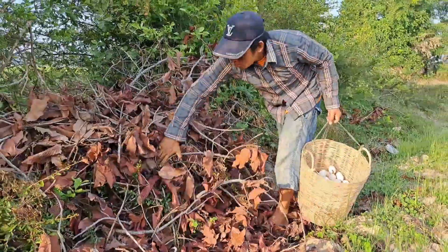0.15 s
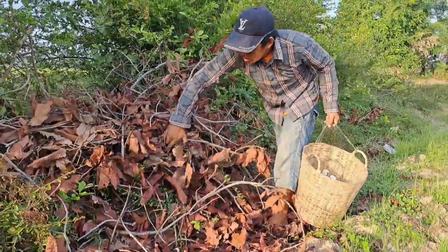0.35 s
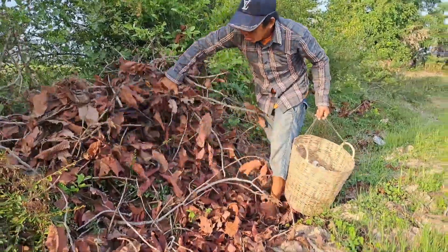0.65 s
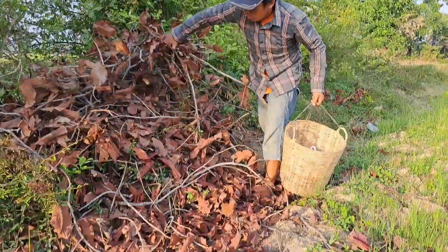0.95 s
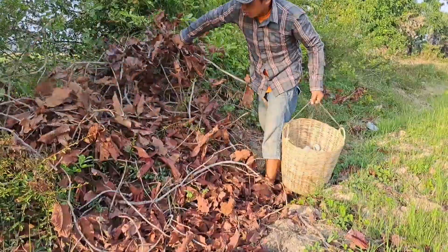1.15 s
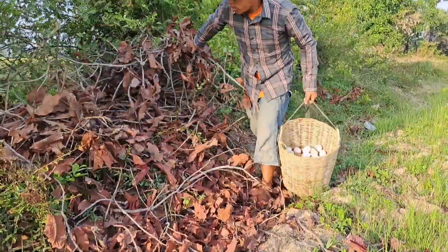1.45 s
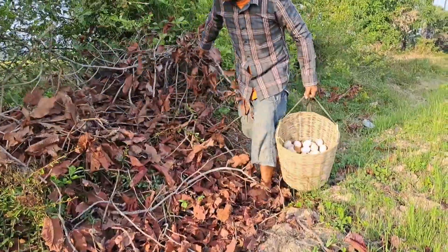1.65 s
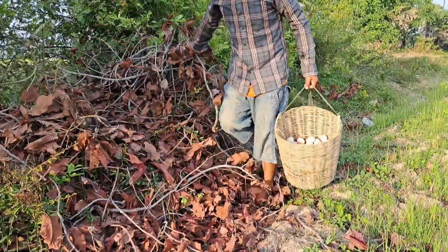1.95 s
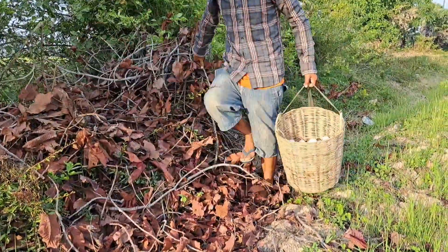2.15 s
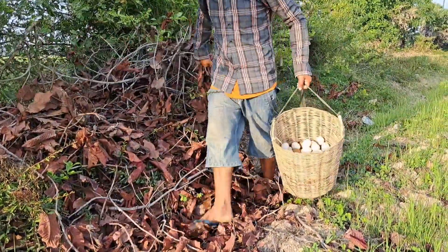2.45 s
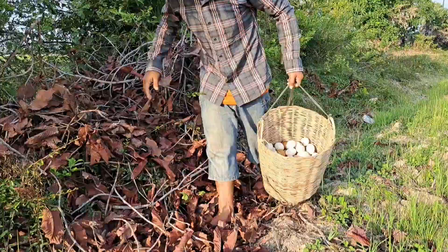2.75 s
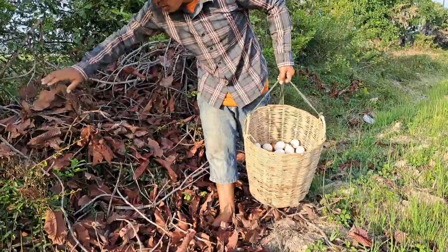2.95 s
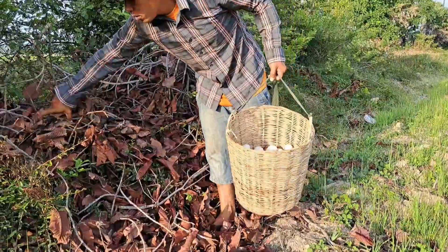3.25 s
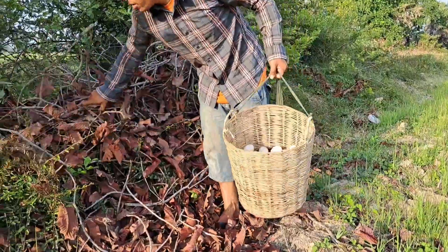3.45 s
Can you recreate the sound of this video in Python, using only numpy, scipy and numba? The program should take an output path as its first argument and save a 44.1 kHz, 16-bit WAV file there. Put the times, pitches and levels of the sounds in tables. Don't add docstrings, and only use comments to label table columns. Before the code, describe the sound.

Close, crisp rustling of a dry leaf pile with stalks cracking, easing off before a foot sinks in and a twig snaps sharply, sparse ticks, then renewed rustling; open grassy place, soft cricket chirps and faint hiss.

```python
import sys
import numpy as np
from scipy import signal
from scipy.fft import rfft, irfft
from scipy.io import wavfile
from numba import njit

SR = 44100
rng = np.random.default_rng(int(sys.argv[2]) if len(sys.argv) > 2 else 0)


def generate_wav(sig):
    pcm = np.round(np.clip(np.atleast_2d(sig).T, -1, 1) * 32767).astype(np.int16)
    wavfile.write(sys.argv[1], SR, pcm)


def level_to_linear(level):
    exponent = np.asarray(level, float) / 20
    return 10 ** exponent


N = 158760
LAG_SPREAD_MS = 0.075


def level(x, db):
    return x * level_to_linear(db) / np.sqrt(np.mean(x ** 2))


def butter(x, order, hz, kind):
    return signal.sosfilt(signal.butter(order, hz, kind, fs=SR, output="sos"), x)


def colour(x, points, share=0.99):
    points = np.array(points, float)
    hz = np.maximum(np.fft.rfftfreq(8192, 1 / SR), 1)
    db = share * np.interp(np.log(hz), np.log(points[:, 0]), points[:, 1])
    cepstrum = irfft(db * np.log(10) / 20)
    cepstrum[1:4096] *= 2
    cepstrum[4097:] = 0
    impulse = irfft(np.exp(rfft(cepstrum)))
    return signal.fftconvolve(np.atleast_2d(x), impulse[None], axes=1)[:, :N]


@njit
def ring(n, at, lag, turn, fade, size):
    out = np.zeros((2, n))
    for g in range(len(at)):
        step = np.exp(1j * turn[g] - fade[g])
        for port in range(2):
            start = at[g] + port * lag[g]
            first = int(np.ceil(start))
            z = size[g] * np.exp((1j * turn[g] - fade[g]) * (first - start))
            for j in range(max(first, 0), min(n, first + int(6 / fade[g]))):
                out[port, j] += z.imag
                z *= step
    return out


def grains(s, hz, t60, size, lag_ms):
    columns = np.broadcast_arrays(s, hz, t60, size, lag_ms)
    s, hz, t60, size, lag_ms = (np.ascontiguousarray(a, float).ravel() for a in columns)
    turn = 2 * np.pi * np.minimum(hz, 0.45 * SR) / SR
    return ring(N, s * SR, lag_ms * SR / 1000, turn, np.log(1000) / (t60 * SR), size)


# frequency in Hz, density in dB per Hz.
AIR_SPECTRUM = [(25, -4), (45, 4), (80, -7), (150, -6), (250, -20), (500, -7), (5000, -16), (15500, -17.5)]


def field():
    rumble_hz, width_hz = 61.5, 27
    mid, side, low, wind = rng.standard_normal((4, N))
    apart = np.array([[1], [-1]])
    side = butter(side, 1, 1500, "high") + 0.27 * wind
    hiss = colour(mid + side * apart, AIR_SPECTRUM)
    band = [rumble_hz - width_hz / 2, rumble_hz + width_hz / 2]
    rumble = butter(low + 0.077 * wind * apart, 2, band, "band")
    return butter(level(hiss, -51) + level(rumble, -58.5), 2, 32, "high")


# start in seconds, length in seconds, level in dB.
CHIRPS = [
    (1.2, 0.2, -2),
    (1.48, 0.22, -1),
    (1.794, 0.17, -3),
    (2.804, 0.27, -5),
    (3.17, 0.17, -3),
]


def cricket():
    rate_hz, wing_hz, wing_t60_s, strokes = 170, 7770, 0.015, 700
    rise_s, stop_s, level_db = 0.071, 0.006, -47.5
    s = np.arange(strokes) / rate_hz
    force, jitter, detune = rng.standard_normal((strokes, 3)).T
    swell = np.zeros(strokes)
    for start, length, db in CHIRPS:
        rise = np.clip((s - start) / rise_s, 0, 1)
        stop = np.clip((start + length - s) / stop_s, 0, 1)
        swell += rise * stop * level_to_linear(db)
    size = swell * level_to_linear(level_db + 8 + 2.8 * force)
    x = grains(s + 0.00016 * jitter, wing_hz * (1 + 0.0046 * detune), wing_t60_s, size, -0.04)
    return butter(x, 1, [7350, 8250], "band")


# time in seconds, effort in dB.
MOVES = [
    [(0, -36), (.08, -34.5), (.13, -34.5), (.27, -29), (.36, -32), (.43, -28), (.56, -28.5), (.75, -29.5),
     (.97, -29.5)],
    [(1.1, -34.5), (1.2, -34.5), (1.32, -35), (1.4, -38.5), (1.52, -35), (1.68, -37.5), (1.83, -42),
     (1.92, -38.5), (1.99, -39)],
    [(2.06, -45.5), (2.18, -44), (2.27, -37), (2.35, -40), (2.46, -38), (2.52, -35.5)],
    [(2.56, -36), (2.63, -34), (2.68, -36), (2.74, -43), (2.78, -53.5)],
    [(2.9, -50), (2.97, -52.5), (3.1, -49.5), (3.17, -40), (3.2, -56.5), (3.23, -40.5)],
    [(3.29, -50), (3.325, -39), (3.35, -32), (3.43, -30), (3.5, -30.5), (3.56, -32.5), (3.6, -28.5)],
]
# tilt in dB per octave, lag of the right port in ms.
PLACES = [
    (0.82, 0.12),
    (0.86, 0.099),
    (0.48, 0.057),
    (-0.5, 0.06),
    (-0.5, -0.026),
    (0.24, 0.17),
]


def place(s):
    move = np.searchsorted([m[0][0] for m in MOVES[1:]], s)
    return np.array(PLACES)[move].T


# time in seconds, peak in dB, pitch
# in Hz, decay (t60) in seconds.
RUSTLES = [(0.052, -28, 2200, 0.08), (0.065, -22, 2100, 0.08), (0.216, -23, 1470, 0.08),
           (0.299, -18, 2190, 0.08), (0.332, -18, 1920, 0.08), (0.383, -16, 900, 0.08),
           (0.417, -18, 5610, 0.08), (0.428, -20, 2120, 0.08), (0.549, -17, 2170, 0.08),
           (0.599, -19, 1420, 0.08), (0.632, -23.5, 630, 0.08), (0.667, -18, 1950, 0.08),
           (0.721, -25, 584, 0.08), (0.765, -11, 3480, 0.08), (0.796, -21, 5520, 0.08),
           (0.834, -13, 2940, 0.08), (0.89, -27, 2050, 0.08), (0.957, -23, 2350, 0.08),
           (1.024, -21, 1850, 0.08), (1.186, -21, 684, 0.08), (1.247, -17, 2030, 0.08),
           (1.267, -25, 912, 0.08), (1.29, -27.5, 713, 0.08), (1.305, -26, 990, 0.08),
           (1.409, -29, 907, 0.08), (1.447, -30, 1450, 0.08), (1.488, -27, 1590, 0.08),
           (1.495, -26, 5490, 0.08), (1.53, -25, 2000, 0.08), (1.558, -32, 1330, 0.08),
           (1.61, -20, 2190, 0.08), (1.635, -25, 2040, 0.08), (1.87, -28, 2710, 0.08),
           (1.899, -25, 5200, 0.08), (1.923, -28, 5050, 0.08), (1.96, -31, 2330, 0.08),
           (2.087, -37, 1490, 0.08), (2.153, -39, 904, 0.08), (2.181, -36, 2010, 0.08),
           (2.22, -35, 2360, 0.08), (2.241, -27, 4130, 0.08), (2.408, -29, 2710, 0.08),
           (.072, -24, 3900, .06), (.134, -21, 5600, .08), (.156, -15, 880, .2), (.8, -19, 4800, .2),
           (2.29, -28, 2400, .08), (2.473, -12, 3800, .03), (2.484, -22, 3600, .04),
           (2.525, -25, 900, 0.075), (2.57, -20, 800, .14), (2.578, -21, 2000, .1), (2.608, -22, 1100, .14),
           (2.62, -21, 800, .14), (2.59, -22, 1100, .12), (2.612, -23, 2200, .14), (2.64, -22, 500, .1),
           (2.636, -19, 1500, .12), (2.655, -18, 1100, .1), (3.168, -35, 1500, 0.025),
           (3.255, -32, 1200, 0.05), (3.36, -26, 1090, .06), (3.39, -28, 4800, 0.039),
           (3.426, -21, 2500, 0.069), (3.469, -33, 1000, .06), (3.495, -25, 4500, .05),
           (3.57, -26, 1500, .05), (3.588, -22, 3000, .05)]


def folds(count=40):
    level_db, spread_octaves, cycles = -10, 0.28, 11
    s, db, hz, t60 = np.array(RUSTLES).T[:, :, None]
    when, sign = np.moveaxis(rng.random((len(s), count, 2)), 2, 0)
    detune, aside = np.moveaxis(rng.standard_normal((len(s), count, 2)), 2, 0)
    late = when ** 1.4 * t60 / 2
    pitch = hz * 2 ** (spread_octaves * detune)
    size = level_to_linear(db + level_db - 60 * late / t60) * (2 * sign - 1) * np.sqrt(pitch / 1600)
    lag = place(s[:, 0])[1][:, None] + LAG_SPREAD_MS / 2 * aside
    return grains(s + late, pitch, cycles / pitch, size, lag)


def splinters(s, db, t60, tilt, lag_ms, count=120):
    s, db, t60, tilt, lag_ms = (a[:, None] for a in (s, db, t60, tilt, lag_ms))
    when, pitch, sign, aside = np.moveaxis(rng.random((len(s), count, 4)), 2, 0)
    late = when ** 1.35 * t60 / 2
    hz = 900 * 18 ** pitch
    size = level_to_linear(db - 60 * late / t60 + tilt * np.log2(hz / 7000)) * (2 * sign - 1)
    return grains(s + late, hz, 4 / hz, size, lag_ms + LAG_SPREAD_MS * (2 * aside - 1))


# time in seconds, peak in dB, pitch in Hz, tilt in dB per octave.
CRACKS = [(0.132, -26, 5200, 3), (0.2442, -7, 2250, 6), (0.4172, -10.5, 2900, 3), (0.512, -3, 5100, 4),
          (1.1357, -20, 1700, 10), (1.1509, -11.5, 2580, 3), (1.736, -22, 2900, 3),
          (1.7695, -17.5, 6170, 9), (2.2572, -26, 3860, 4), (2.3869, -22, 1610, 1.5),
          (2.4348, -19.5, 2340, 1), (2.4724, -20, 3830, 6), (2.6394, -27, 5500, 3), (2.7444, -44, 3540, 0),
          (2.8009, -44, 1530, 2.6), (2.8285, -25, 2780, 5), (2.8977, -31, 4600, 2),
          (2.9144, -28, 3480, 6.5), (2.9293, -24.5, 2330, 3.5), (2.994, -26.5, 3480, 4),
          (3.0146, -31, 1810, 0.5), (3.1064, -33, 3400, 7), (3.1245, -23, 3870, 4), (3.1587, -18, 3950, 8),
          (3.207, -28, 3560, 7), (3.31, -35, 1360, 1), (3.3317, -40, 3870, 11), (3.3452, -22, 3750, 3)]


def cracks():
    late_s, ring_db, splinter_db, cycles, t60_s = 0.0012, -9, -0.5, 7, 0.026
    s, db, hz, tilt = np.array(CRACKS).T
    s = s + late_s
    lag = place(s)[1]
    rings = grains(s, hz, cycles * 3 / hz, level_to_linear(db + ring_db), lag)
    shower = splinters(s, db + splinter_db, np.full(len(s), t60_s), tilt, lag)
    return butter(rings + shower, 2, 900, "high")


# frequency in Hz, level in dB, decay (t60) in seconds.
TWIG = [(420, -24, 0.012), (830, -20, 0.014), (1150, -2.5, 0.015), (1470, -3.5, 0.012), (3550, -4, 0.0045),
        (5530, -4, 0.0071), (7900, -6, 0.0088), (13800, -1, 0.0046)]


def snap():
    at_s, level_db, click_hz, ring_db, splinter_db, t60_s = 2.6929, 0, 2580, -13, -12, 0.03
    hz, db, t60 = np.array(TWIG).T
    click = grains(at_s, click_hz, 0.0012, level_to_linear(level_db), 0.0098)
    wood = grains(at_s + 0.000309, hz, t60, level_to_linear(db + level_db + ring_db), 0.013)
    one = np.ones(1)
    shower = splinters(at_s * one, (level_db + splinter_db) * one, t60_s * one, one, 0.015 * one)
    return butter(click + wood + shower, 2, 560, "high")


def crunches(count=200):
    level_db, scatter_db, t60_s = -10, 1.8, 0.07
    when, strength = rng.random((2, 3, count))
    kick = np.zeros((3, N))
    db = level_db + scatter_db * np.minimum(-np.log(strength), 2.5)
    kick[np.arange(3)[:, None], (when * N).astype(int)] = level_to_linear(db)
    return 1 + signal.lfilter([1], [1, -np.exp(-np.log(1000) / (t60_s * SR))], kick)


# frequency in Hz, density in dB per Hz.
LEAF_SPECTRUM = [(59, -44), (100, -9), (275, -8), (539, -5.5), (912, -5.5), (1280, -4), (5450, -4),
                 (8850, -9.5), (15300, -7)]


def leaves(count=90000):
    cycles, scatter_db = 1.26, 1.5
    when, pitch, strength, sign = rng.random((count, 4)).T
    aside, blur = rng.standard_normal((count, 2)).T
    s = when * N / SR
    hz = 120 * 150 ** np.sqrt(pitch)
    zone = np.clip(np.log2(hz / 700) / 1.6 + 0.4 * blur, 0, 2).astype(int)
    crunch = crunches()[zone, (s * SR).astype(int)]
    effort_s, effort_db = np.concatenate([np.array(m) for m in MOVES]).T
    tilt, lag = place(s)
    db = np.interp(s, effort_s, effort_db) + tilt * np.log2(hz / 3000)
    db += scatter_db * np.minimum(-np.log(strength), 4.5)
    even = hz / 3000 / np.sqrt(np.log(hz / 110))
    size = level_to_linear(db) * even * crunch * np.sign(sign - 0.5)
    ticks = grains(s, hz, cycles * 3 / hz, size, lag + LAG_SPREAD_MS * aside)
    effort = level_to_linear(np.interp(np.arange(N) / SR, effort_s, effort_db))
    return level(colour(ticks, LEAF_SPECTRUM), 10 * np.log10(np.mean(effort ** 2)) + 1)


def scene():
    ground_ms, ground_db = 2.5, -10
    breaks = cracks() + snap()
    echo = np.roll(breaks, int(ground_ms * SR / 1000), axis=1) * level_to_linear(ground_db)
    return field() + cricket() + folds() + breaks + echo + leaves()


def roll_off(x):
    return signal.sosfilt(signal.butter(12, 16660, fs=SR, output="sos"), x)


# frequency in Hz, left minus right in dB.
PORTS = [(50, -2), (150, 1.7), (500, -0.5), (1200, -1.9), (2500, -4), (5000, -5.5), (8000, -2),
         (12000, 2.9)]


def record(dry):
    top_hz = 15480
    left, right = colour(dry[0], PORTS, 0.5), colour(dry[1], PORTS, -0.5)
    x = np.concatenate([left, right])
    x = colour(x, [(top_hz, 0), (top_hz + 40, -35), (16600, -46)])
    return roll_off(x)


dry = scene()
out = record(dry)
generate_wav(out)
```